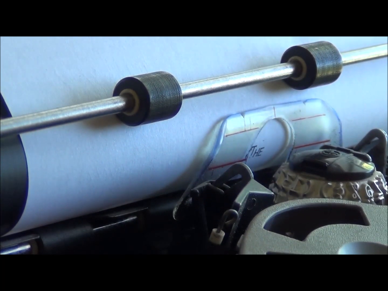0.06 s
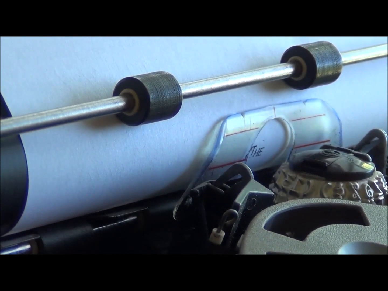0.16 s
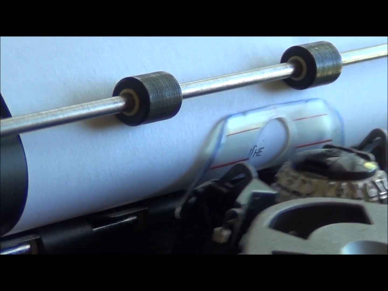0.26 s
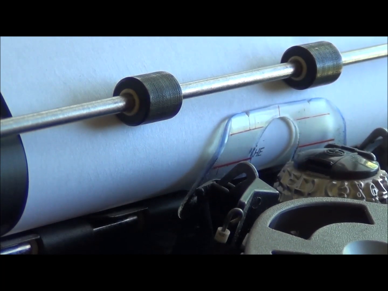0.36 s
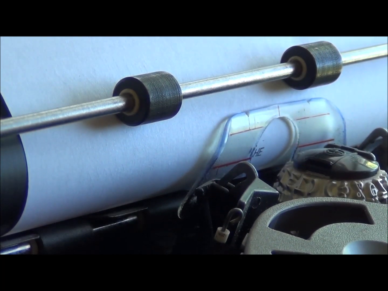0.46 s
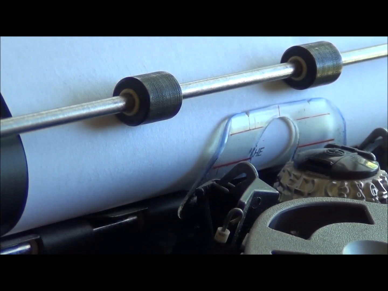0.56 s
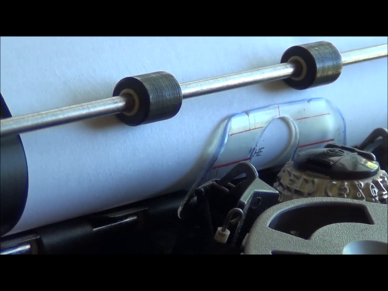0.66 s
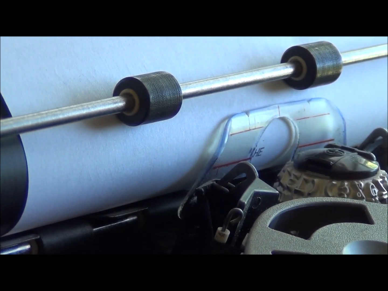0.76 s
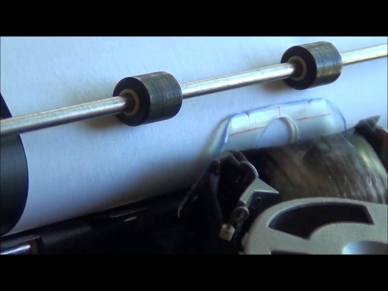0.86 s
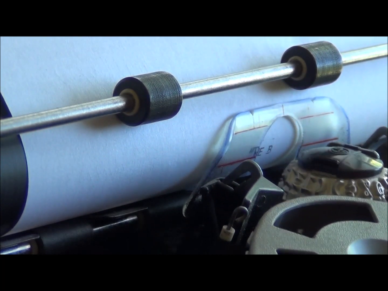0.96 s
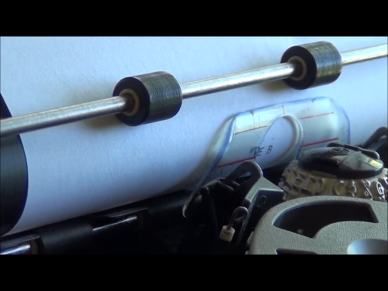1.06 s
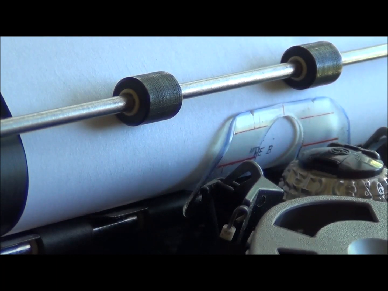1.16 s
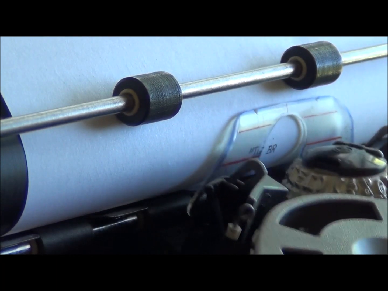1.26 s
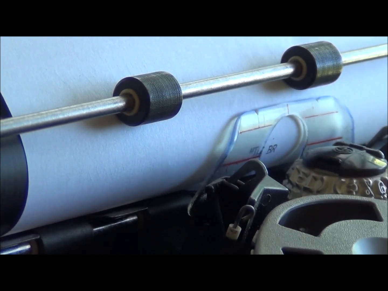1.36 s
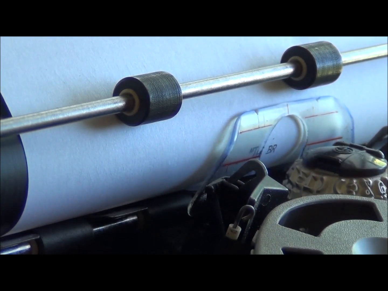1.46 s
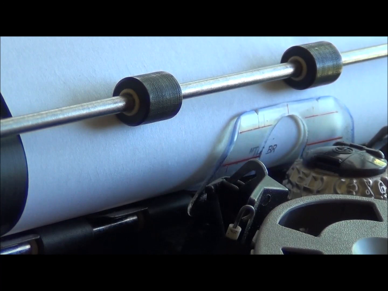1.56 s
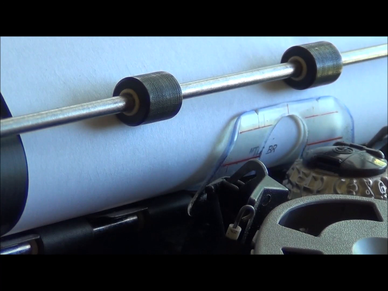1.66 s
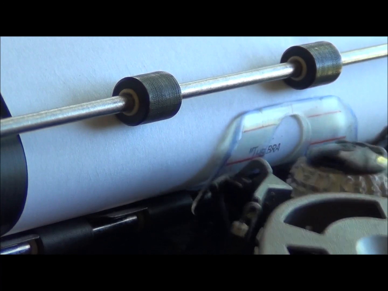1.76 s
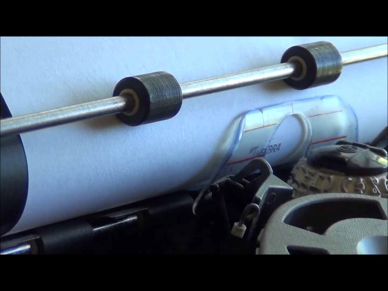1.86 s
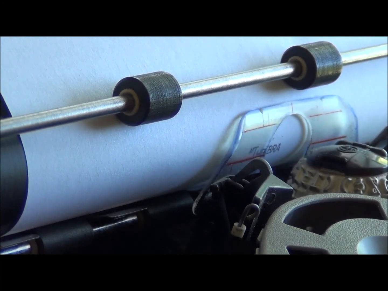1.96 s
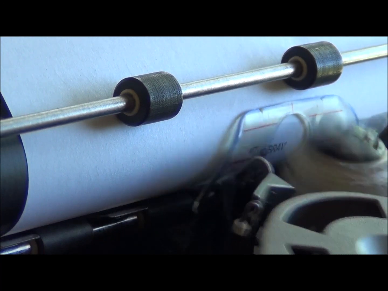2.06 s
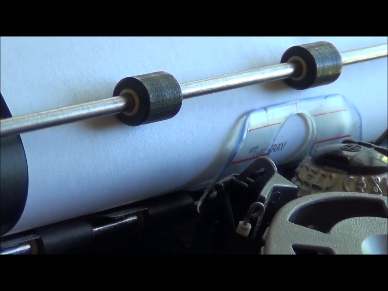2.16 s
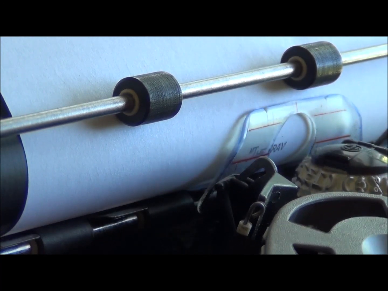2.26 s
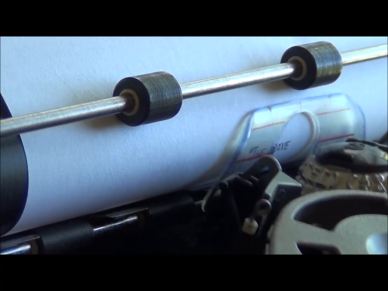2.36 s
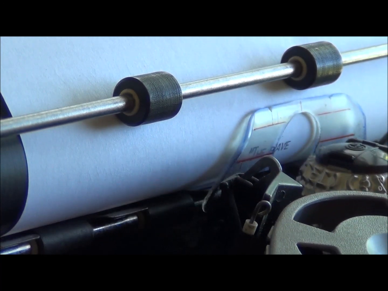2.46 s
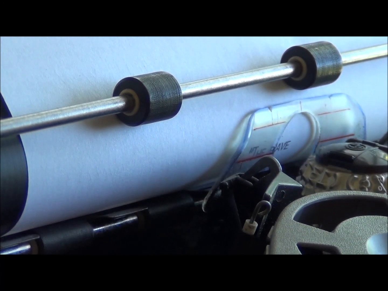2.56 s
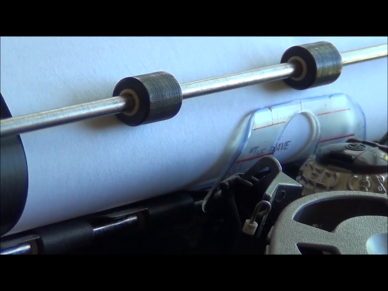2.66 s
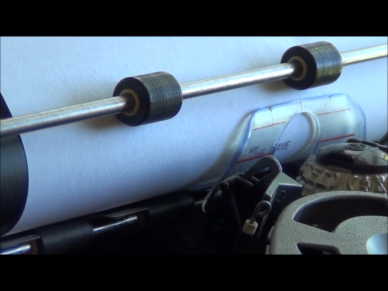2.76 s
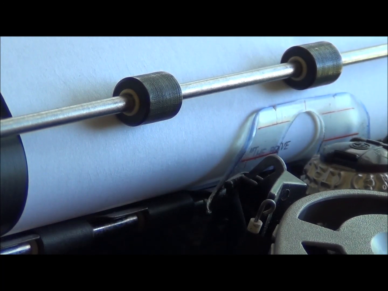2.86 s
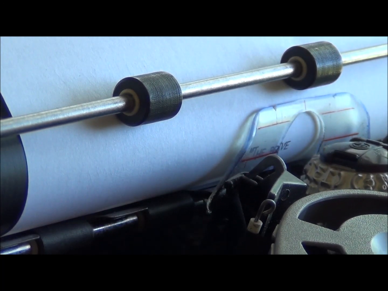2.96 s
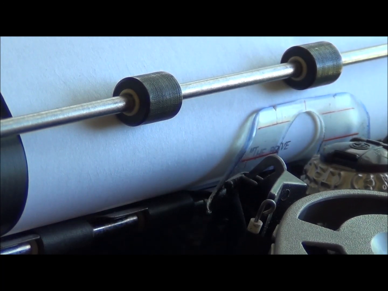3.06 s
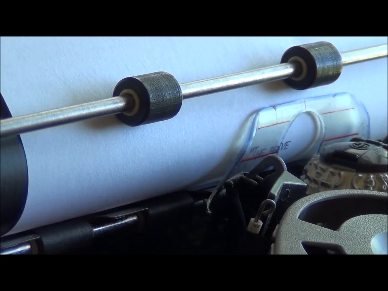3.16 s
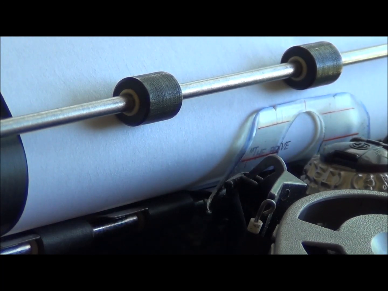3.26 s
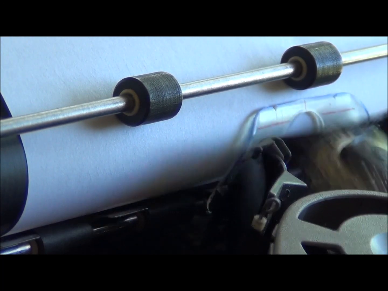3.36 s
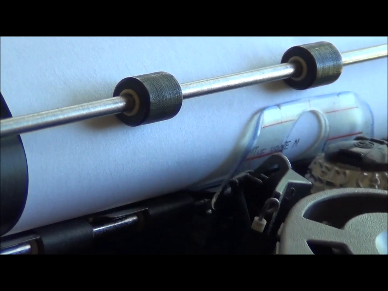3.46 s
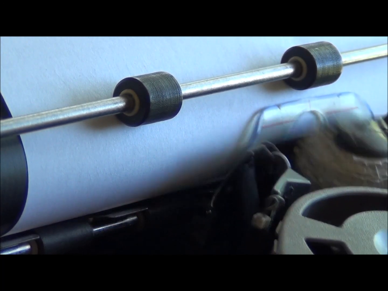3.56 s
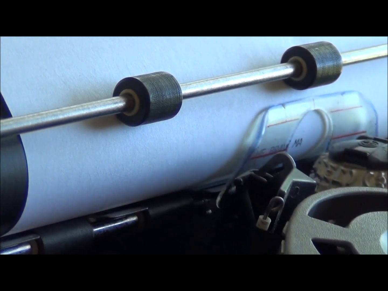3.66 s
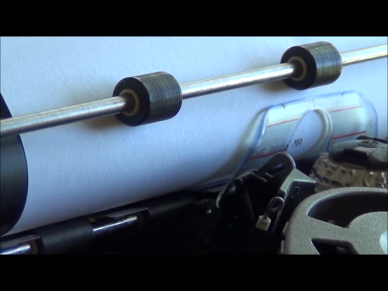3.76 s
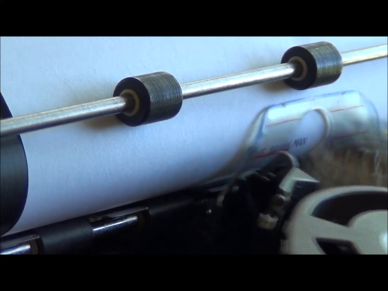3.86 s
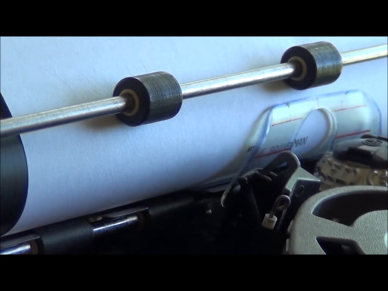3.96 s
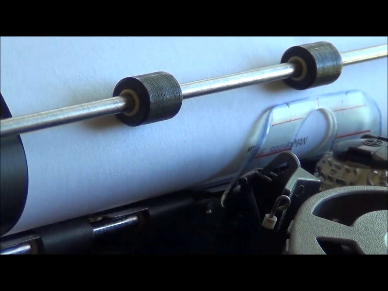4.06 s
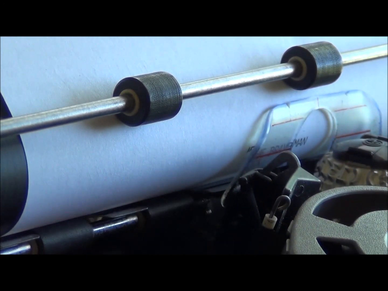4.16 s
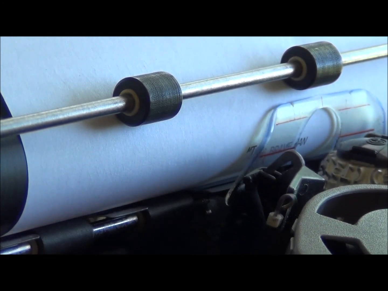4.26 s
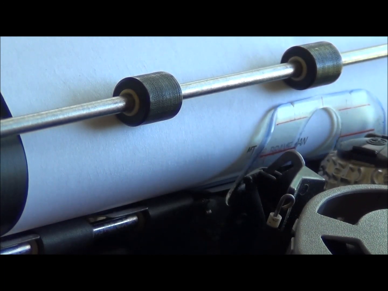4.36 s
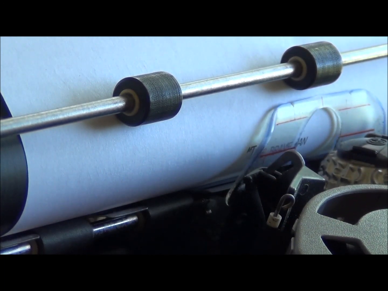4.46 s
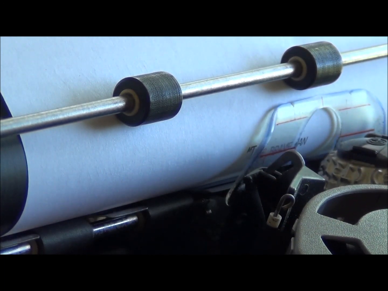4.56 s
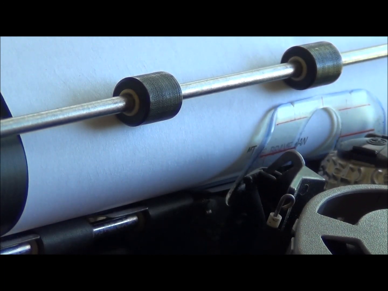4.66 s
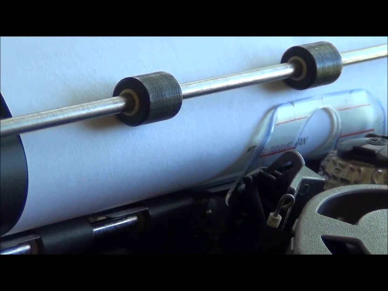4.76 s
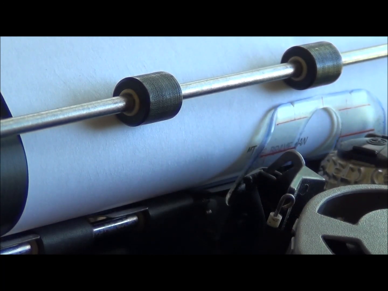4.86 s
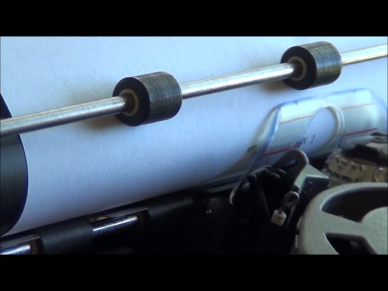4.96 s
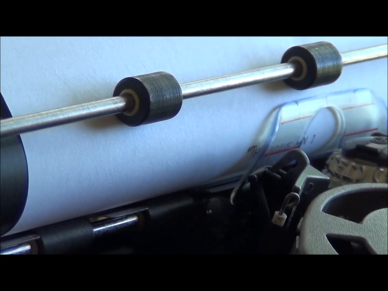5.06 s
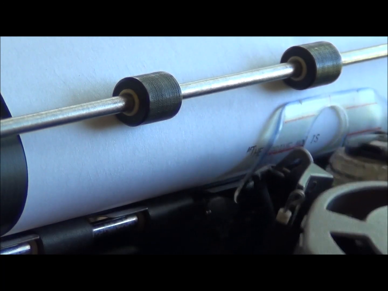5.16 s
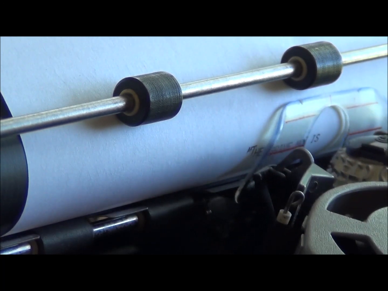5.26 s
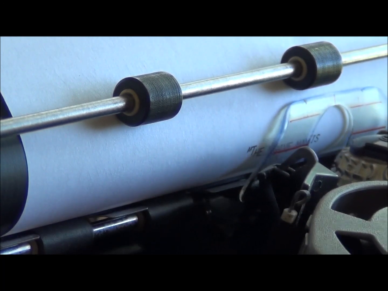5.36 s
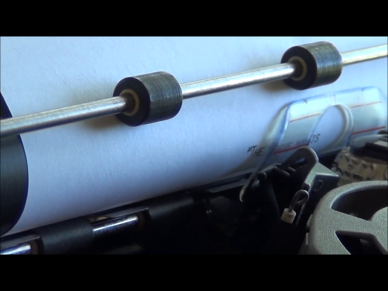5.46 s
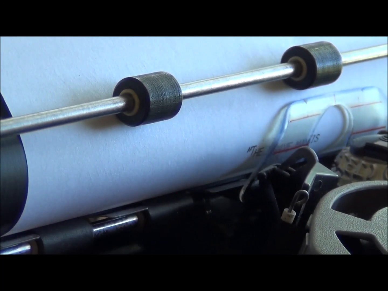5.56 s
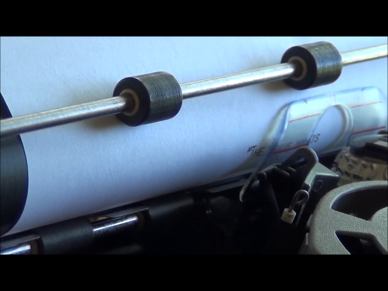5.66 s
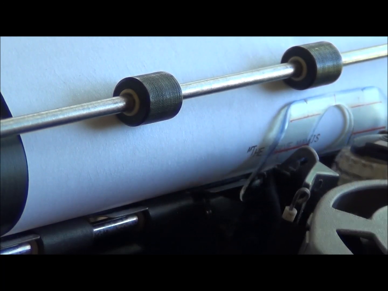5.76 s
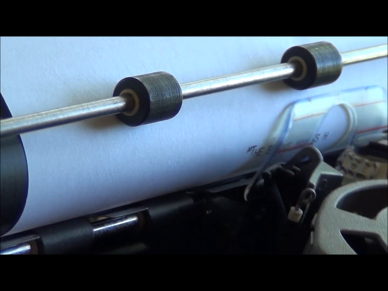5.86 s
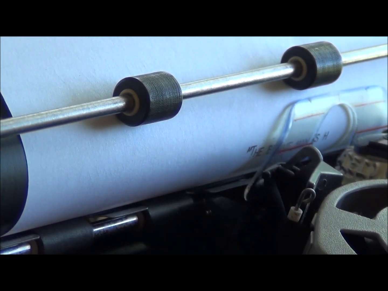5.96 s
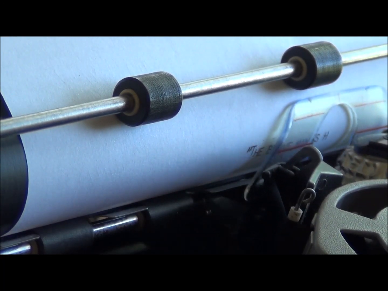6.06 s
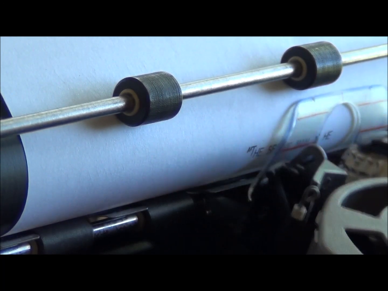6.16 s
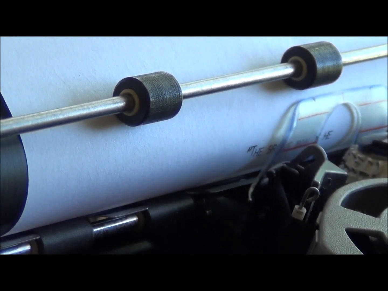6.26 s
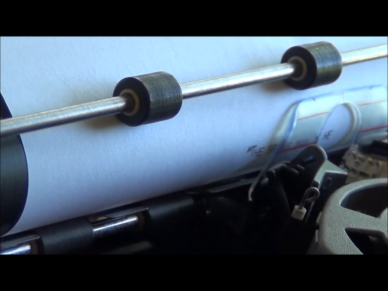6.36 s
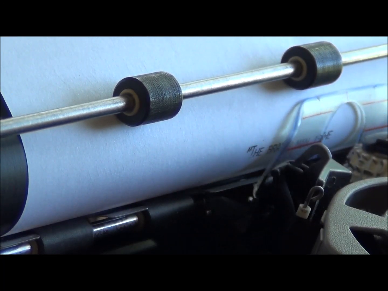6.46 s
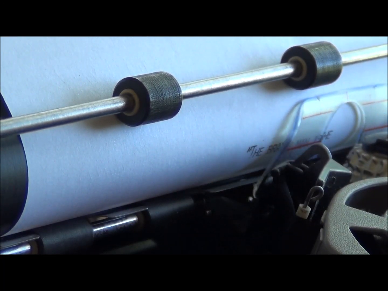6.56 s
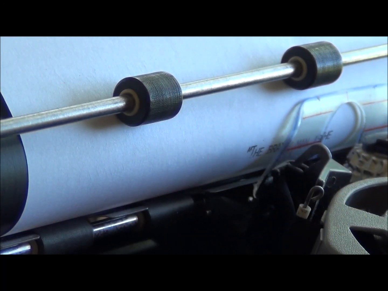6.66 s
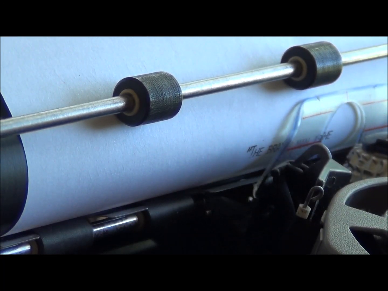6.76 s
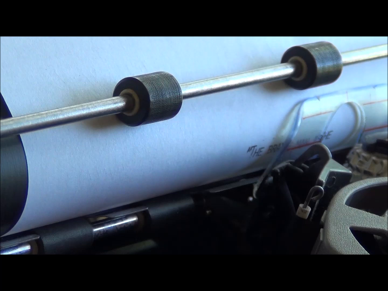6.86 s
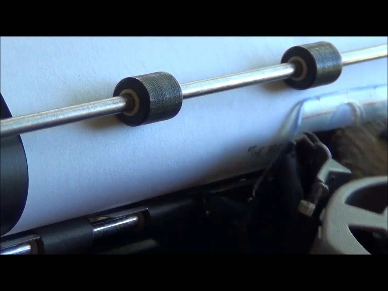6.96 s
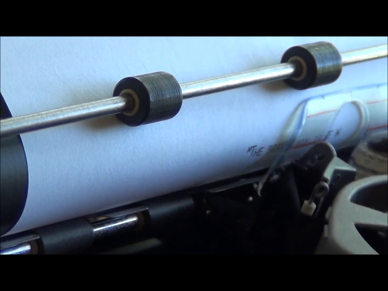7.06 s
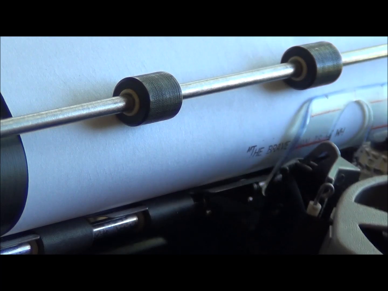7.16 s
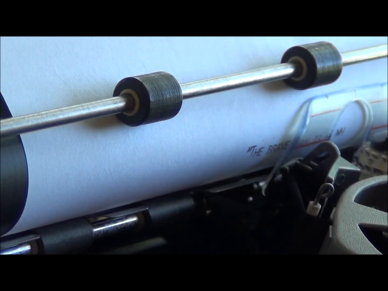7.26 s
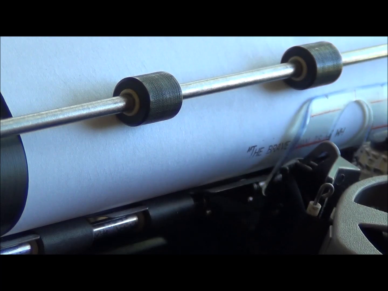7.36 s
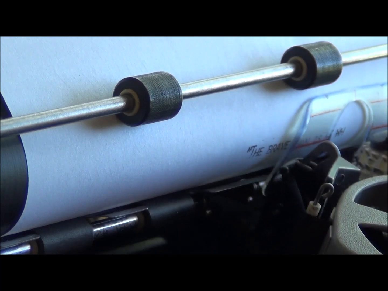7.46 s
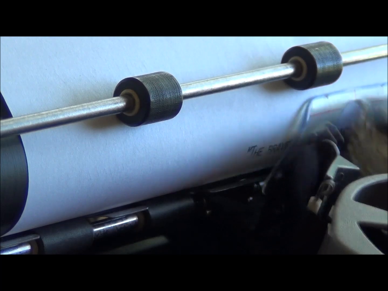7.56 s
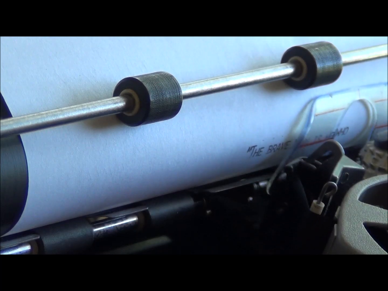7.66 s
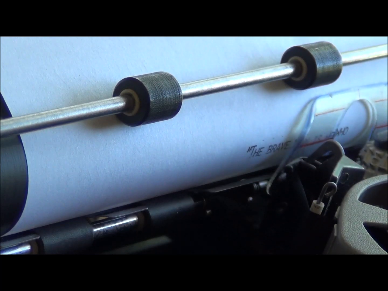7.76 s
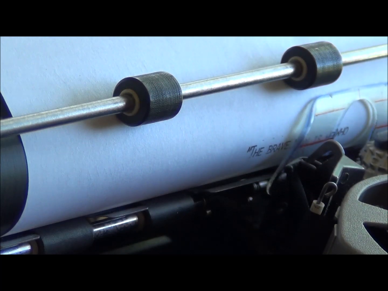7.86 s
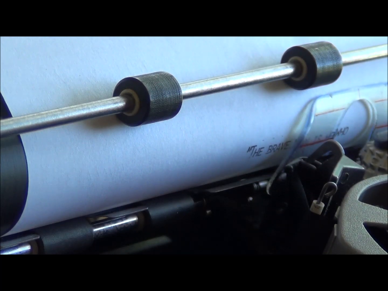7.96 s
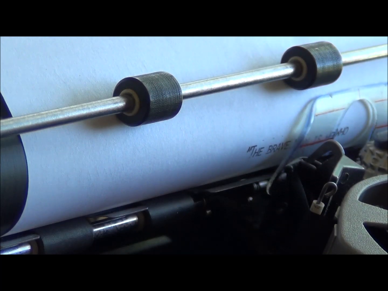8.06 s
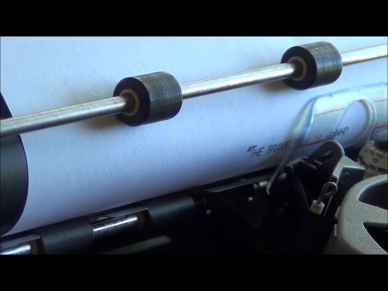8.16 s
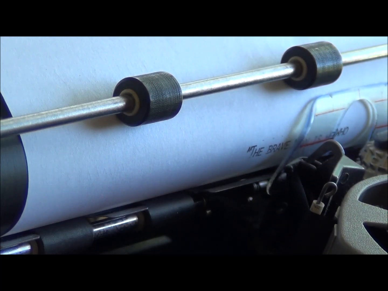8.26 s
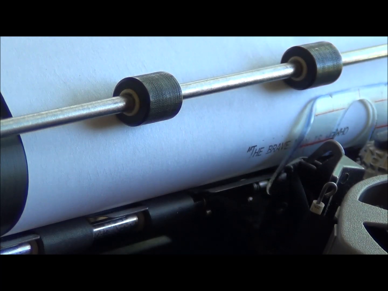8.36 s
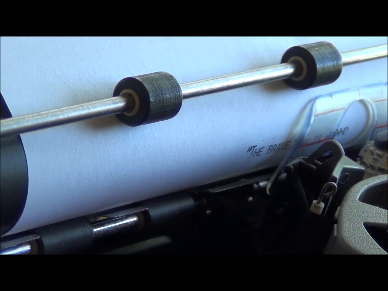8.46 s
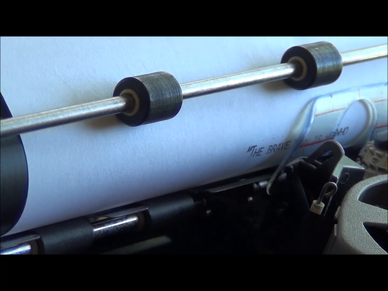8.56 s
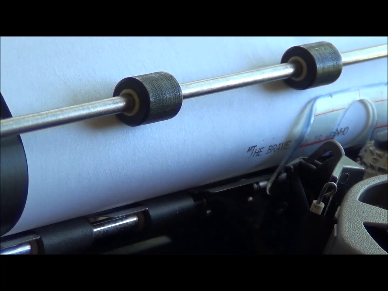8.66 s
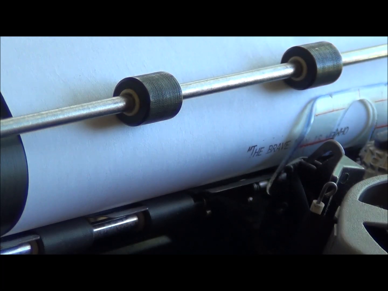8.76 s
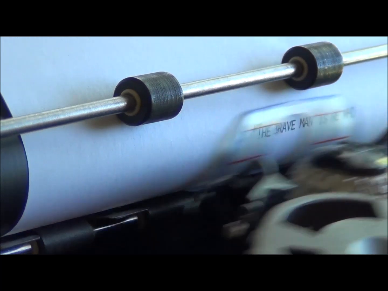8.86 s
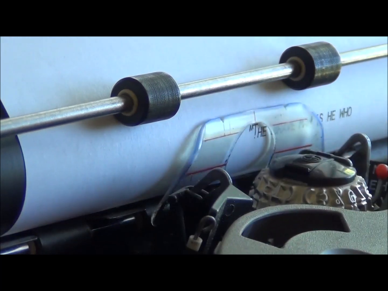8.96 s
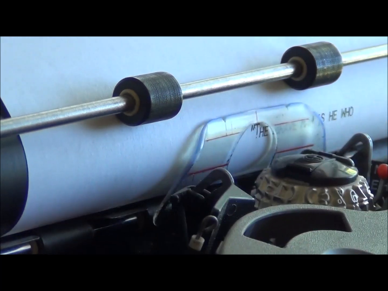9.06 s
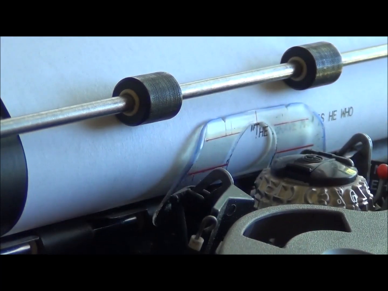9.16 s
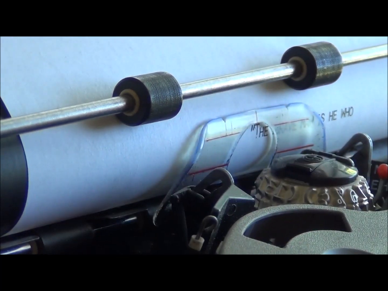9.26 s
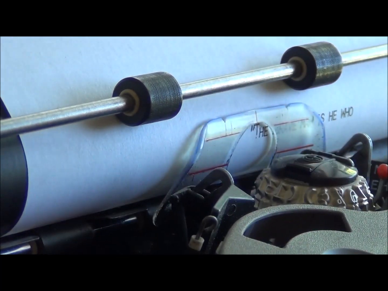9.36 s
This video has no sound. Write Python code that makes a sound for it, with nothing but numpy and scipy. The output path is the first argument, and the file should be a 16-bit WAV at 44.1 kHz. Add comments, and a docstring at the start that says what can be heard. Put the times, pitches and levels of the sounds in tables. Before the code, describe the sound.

An electric typewriter is heard close up in a small room, its motor humming and whirring softly throughout. Each letter is a sharp, rattling steel clack with a brief metallic ring. One strikes right at the start, then five follow unevenly between 0.9 and 2.3 seconds. Three more come from 3.4 to 3.9 seconds, pairs around 5 and 6 seconds, and another three from 7 to 7.6 seconds. Lighter space bar clicks fall between the words at about 0.3, 2.8, 4.3, 5.4 and 6.4 seconds. Around 8 seconds the belt gives a very faint, thin, high squeal. At 8.7 seconds the carrier jerks back and hits its stop with a quick clatter, the paper ratchets up, and the machine shudders briefly. One last letter strikes at about 9.4 seconds over the continuing hum.

```python
"""An electric type-ball typewriter, heard close up in a small room. Its motor hums from the start.
A few words are typed: each key trips a cam, which fires a quick volley of steel blows that rattle
and ring the carrier (the part that carries the ball), the rack and the case. Near 8 seconds the belt
slips and squeals faintly. Then the carrier returns, the paper moves up, and one more letter begins.
All along, a limiter flattens each volley."""
import sys
import numpy as np
from scipy import signal
from scipy.fft import rfft, irfft
from scipy.io import wavfile
from scipy.ndimage import uniform_filter1d

SR = 44100
rng = np.random.default_rng(int(sys.argv[2]) if len(sys.argv) > 2 else 0)


def generate_wav(signal):
    """Clip the signal to [-1, 1] and save it as 16-bit WAV at the path in sys.argv[1]."""
    frames = np.transpose(np.atleast_2d(signal))
    scaled = np.clip(frames, -1, 1) * 32767
    pcm = np.round(scaled).astype(np.int16)
    wavfile.write(sys.argv[1], SR, pcm)


N = 415422

# The hum of the motor and its belt. Each row: pitch in Hz, level in dB.
HUM_TONES = [(58.6, -68), (120, -71.5), (234, -62.5), (281, -63), (354, -62), (469, -63), (645, -70.5),
             (840, -73.5), (942, -83)]
# The tone colour of the motor's whirr. Each row: frequency in Hz, relative level in dB.
WHIRR_COLOUR = [(15, -29.5), (33, -8), (80, -13), (130, -11.5), (230, -5.5), (370, -9.5), (520, -13),
                (850, -17.5), (1500, -17), (2600, -26.5), (4000, -30.5), (6500, -37.5), (10000, -39),
                (16000, -44)]
# The belt chirps on its pulley: pitch in Hz, level in dB, depth of the pulsing.
BELT_CHIRP = (2585, -71.5, .9)
# The tone colour of a steel clack. Each row: frequency in Hz, relative level in dB.
STEEL_COLOUR = [(40, -34), (130, -26.5), (280, -5), (600, -2.5), (950, -4), (1600, 2), (2100, -3.5),
                (2900, 2), (4500, -3.5), (6300, -4), (8800, -4.5), (10200, -6.5), (13000, -8.5),
                (15800, -17)]
# The notes each part rings with. Each row: pitch in Hz, level in dB, seconds to fade by 60 dB.
PART_NOTES = {"carrier": [(1272.6, 1, 0.2), (1287, 0.5, 0.28), (1440, 5, .07), (719, -2.5, .12),
              (670, -21.5, 0.088), (1168, -10, 0.05)], "rack": [(1569, 9, 0.021), (1507, -4, 0.12),
              (1580, -22.5, 0.076), (1690, -14, 0.21), (1825, -7, 0.042), (2540, -5.5, 0.062),
              (796, -21.5, 0.32)], "ball": [(9430, -1, 0.091), (8640, -10.5, 0.064), (10821, -8, .14),
              (12900, -7.5, .15), (11300, -15, .12), (8700, -4, 0.11)], "stop": [(1000, -2, 0.075),
              (810, -2, .06), (1140, -8, 0.068), (624, -2.5, 0.07), (1600, 4, 0.04)],
              "ratchet": [(2600, 8, 0.053), (3200, -13, 0.052), (2480, 2, 0.052), (3420, 0, 0.1)],
              "base": [(122, -3, .2), (160, -7, 0.27), (220, -13, .15), (291, 5.5, 0.34), (440, -11, .15),
              (535, -6.5, 0.67)], "pawl": [(7460, 3, 0.012), (8370, -2, 0.0051), (9080, -1.5, 0.021),
              (3300, -17.5, 0.084)], "spring": [(12440, 5, 0.031), (12500, 4.5, .06), (11700, 7, 0.15)],
              "case": [(281, 1, 0.18), (320, -9.5, 0.087), (372.6, 1, 0.14), (230, -16.5, 0.3),
              (477.5, -9.5, 0.22), (516.8, -10, 0.16), (129, -18, .17), (170.8, -22, 0.42)]}

# The typed letters. Each row: strike time in seconds, force in dB, stretch factor for the timing of
# its blows, added brightness in dB per octave, extra ring of the ball in dB.
LETTER_KEYS = [(-.05, -1.5, 1.05, 2, -11), (.8962, 0.5, 0.98, -0.05, -7), (1.2271, -2, 1.01, 0, 12),
               (1.7637, -.5, 0.98, 0, 10), (2.0787, -3, 1.02, -0.1, 9.5), (2.3296, -4, 1.003, -0.1, 5.5),
               (3.399, -1, 1.02, 0.3, 11.5), (3.5875, -1, 1.015, -0.3, 5.5), (3.8759, -2, 1.01, -0.1, 7.5),
               (4.935, 0, 1.065, -0.3, 8), (5.1613, .5, 1.01, -.2, 3.5), (5.8241, 0, 1, -0.5, -10.5),
               (6.1561, -1, 1.01, -0.3, 10), (6.9948, 1, 1.074, -.7, -8), (7.1221, -.5, .96, 0.4, 4),
               (7.587, -1.5, 1.084, -0.4, 6), (9.4455, 2, 1, 1, -7)]
# The blows of a letter. Each row: seconds from the strike, clack level in dB, rattle fade in seconds,
# brightness in dB per octave, thump of the case in dB, the part that rings, its ring level in dB.
LATCH = (-.064, -40.5, .002, 5.5, -66, "pawl", -50)
CLUTCH = (-.0485, -27.5, .0045, .5, -51.5, "pawl", -18.5)
BALL_TILT = (-.042, -18.5, 0.0097, .8, -32.5, "carrier", -29.5)
BALL_TURN = (-.025, -23.5, 0.01, 1.2, -41, "ball", -33)
DETENT = (-.009, -22, .002, 0, -36.5, "carrier", -50)  # a catch that locks the ball in place
STRIKE = (0, -13, .002, 1.3, -30, "ball", -35.5)
CARRIER_STEP = (.017, -20.5, 0.013, 2.2, -36.5, "rack", -22)
BALL_DROP = (.0409, -27.5, .001, -1, -38.5, "pawl", -23.5)  # the ball drops back with a sharp, high tick
BALL_REST = (.043, -37.5, .003, 4, -45, "ball", -43)  # the ball falls back and pings

# The spaces. Each row is like a letter's, but the time is the carrier's step and the spring rings.
SPACE_KEYS = [(0.2823, 1.2, 1.03, 0.52, 6), (2.8221, -0.42, 1.057, 0, 9), (4.268, -0.93, 1, 0, 7),
              (5.3687, 1.1, 1, 0, 16.5), (6.4132, 0, 1, 0, 1)]
# The blows of a space. Each row is like a letter's blow, timed from the carrier's step.
BAR_TRIP = (-.059, -35.5, 0.0071, 1.5, -50.5, "carrier", -43)
BAR_SPRING = (-.053, -25.5, 0.0088, 1.8, -41, "spring", -50.5)
CAM_TURN = (-.033, -45.5, .012, .5, -47, "rack", -55.5)
PAWL_LIFT = (-.009, -26, 0.0071, 0.52, -49, "pawl", -21)
SPACE_STEP = (0, -22.5, 0.0079, .5, -43.5, "rack", -28)
# The space bar clicks when touched and when it comes back up. Each row: start in seconds, force in dB.
BAR_CLICKS = [(0.1914, -12), (.380, 0), (2.731, -16), (2.9188, -2), (4.183, -15), (4.368, -2.5),
              (5.481, 2.5), (6.5286, -1.5)]
# One such click: a blow's row without the time.
BAR_BLOW = (-32.5, .0025, 2, -48, "rack", -53.5)

# The slipping belt's note: pitch in Hz, level in dB, overtones in dB compared with the note.
SQUEAL_NOTE = (2528, -69, -3)
# When it slips: start in seconds, end in seconds.
SQUEAL_SPAN = (7.74, 8.2)

# The blows of the carrier's return. Each row is like a letter's blow, timed from the first pull.
RETURN_PULL = (0, -21.5, 0.0077, 2.7, -52, "carrier", -45.5)
RETURN_SLIDE = (0.028, -34.5, 0.078, -3.5, -52, "rack", -39)
RETURN_BRAKE = (.075, -24.5, .003, 3.5, -54, "carrier", -37)
MARGIN_STOP = (.0862, -23.5, .001, -3.5, -39, "stop", -25)
REBOUND = (.099, -29, 0.021, -1, -39, "rack", -35)
UNLATCH = (.122, -20.5, 0.01, .5, -40.5, "ratchet", -37)
STOP_SHUDDER = (.142, -33, 0.011, -8, -40, "base", -45)  # the whole machine rocks on its base
LINE_FEED = (.2145, -22.5, 0.012, 2.2, -38, "ratchet", -34.5)
FEED_SHUDDER = (.237, -34.5, .015, -8.5, -42, "base", -37)
# A light latch clicks just before the pull and the line feed: a blow's row, timed from each of them.
RETURN_LATCH = (-.0068, -36.5, .003, 2.5, -59, "pawl", -50)

# How long the frame and the room ring on. Each row: frequency in Hz, seconds to fade by 60 dB.
FRAME_FADE = [(200, 0.077), (1500, 0.16), (5000, 0.11), (15000, 0.05)]
ROOM_FADE = [(150, 0.47), (500, 0.98), (1500, 0.61), (3000, 0.53), (6000, 0.5), (10000, 0.25),
             (16000, 0.36)]
# How much left and right differ. Each row: frequency in Hz, gain of the difference in dB.
STEREO_WIDTH = [(50, -54), (120, -41.5), (280, -49.5), (550, -21), (1100, -19), (2200, -16.5), (4500, -9.5),
                (8000, -12.5), (12000, -30), (16000, -40)]


def gain_of(db):
    """Turns decibels into a number to multiply by."""
    return 10 ** (np.asarray(db) / 20)


def evened(x):
    """Scales a signal to an average power of 1."""
    return x / np.sqrt(np.mean(x ** 2) + 1e-20)


def look_up(table, hz):
    """Reads between a table's rows, with frequency counted in octaves."""
    row_hz, values = np.transpose(table)
    return np.interp(np.log(hz + 1), np.log(row_hz + 1), values)


def add(mix, start_s, sound):
    """Adds a sound to the mix, cutting off whatever sticks out at either end."""
    start = round(start_s * SR)
    sound = sound[max(-start, 0):]
    part = mix[max(start, 0):][:len(sound)]
    part += sound[:len(part)]


def coloured(x, table):
    """Turns each frequency up or down by a table's decibels."""
    hz = np.fft.rfftfreq(len(x), 1 / SR)
    return irfft(rfft(x) * gain_of(look_up(table, hz)), len(x))


def drift(hz):
    """A smooth random wobble, up to about hz times a second."""
    rolloff = 1 + (np.fft.rfftfreq(N, 1 / SR) / hz) ** 4
    return evened(irfft(rfft(rng.standard_normal(N)) / rolloff, N))


def motor(pulley_hz=29, waver=0.16, wander_hz=1.2, whirr_db=-56, throb=0.1, flutter_hz=18):
    """The motor hums and whirrs, and the belt chirps faintly at each turn of the pulley."""
    t = np.arange(N) / SR
    turn = np.cos(2 * np.pi * (pulley_hz * t + np.cumsum(drift(2.2)) / SR / 2))
    hum = np.zeros(N)
    for hz, db in HUM_TONES:
        level = np.sqrt(2) * gain_of(db) * (1 + waver * drift(7.9))
        cycles = hz * t + wander_hz * np.cumsum(drift(3.6)) / SR
        hum += level * np.sin(2 * np.pi * cycles)
    whirr = evened(coloured(rng.standard_normal(N), WHIRR_COLOUR)) * (1 + throb * turn)
    hz, db, depth = BELT_CHIRP
    pulses = gain_of(db) * evened(np.exp(2 * depth * turn))
    chirp = pulses * np.sin(2 * np.pi * np.cumsum(hz + flutter_hz * drift(60)) / SR)
    return hum + gain_of(whirr_db) * whirr + chirp


def steel_click(brightness, size=2048):
    """One sharp click on steel; more brightness tips it toward the treble."""
    hz = abs(np.fft.fftfreq(size, 1 / SR))
    octaves = np.log2(np.maximum(hz, 500) / 4000)
    log_gain = np.log(gain_of(look_up(STEEL_COLOUR, hz) + brightness * octaves))
    spectrum = np.exp(np.conj(signal.hilbert(log_gain)))  # packs the energy at the start
    click = np.fft.ifft(spectrum).real[:size // 2]
    return click / np.linalg.norm(click)


def clack(rattle_s, brightness, contact_s=0.0025, rise_s=0.00088, lever_s=0.0062, size=4096):
    """One hard contact, then loose parts chatter and six small levers ring briefly."""
    t = np.arange(size) / SR
    grains = evened(gain_of(3.5 * np.repeat(rng.standard_normal(size // 32), 32)))
    chatter = gain_of(-1) * grains * np.exp(-t / max(rattle_s, contact_s))
    force = np.exp(-t / contact_s) + chatter
    pitch, phase = rng.random((2, 6, 1))
    lever_hz = 2000 + 11000 * pitch ** 2
    levers = np.sin(2 * np.pi * (lever_hz * t + phase)).mean(0)
    zing = gain_of(-8) * evened(levers) * np.exp(-t / lever_s)
    shaking = (force * rng.standard_normal(size) + zing) * (1 - np.exp(-t / rise_s))
    return signal.fftconvolve(shaking, steel_click(brightness))


def ring(part, rise_s=0.00086, detune=0.0036, detune_hz=10, size=12000):
    """A struck part rings with its own fading notes, tuned a little differently each time."""
    t = np.arange(size) / SR
    hz, db, fade_s = np.transpose(PART_NOTES[part])[:, :, None]
    shift, phase = rng.standard_normal(hz.shape), rng.random(hz.shape)
    hz = hz + shift * np.maximum(detune * hz, detune_hz)
    notes = gain_of(db - 60 * t / fade_s) * np.sin(2 * np.pi * (hz * t + phase))
    return notes.sum(0) * (1 - np.exp(-t / rise_s))


def blow(clack_db, rattle_s, brightness, thump_db, part, ring_db):
    """Steel hits steel: a clack, the ring of the struck part, and the slower thump of the case."""
    sound = gain_of(ring_db) * ring(part)
    sound += gain_of(thump_db) * ring("case", rise_s=0.004, detune_hz=3.87)
    add(sound, 0, gain_of(clack_db) * clack(rattle_s, brightness))
    return sound


def knocks(first, count, gap_s, drop_db, duller, thump_drop_db):
    """Repeats a blow's row, each time weaker and duller; negative steps go the other way."""
    start_s, clack_db, rattle_s, brightness, thump_db, part, ring_db = first
    return [(start_s + k * gap_s, clack_db - k * drop_db, rattle_s, brightness - k * duller,
             thump_db - k * thump_drop_db, part, ring_db - k * drop_db) for k in range(count)]


def typing(keys, blows, uneven_db=2.0, jitter_s=.0004):
    """Each key turns the cam once, firing the same blows with slightly uneven timing and force."""
    out = np.zeros(N)
    for key_s, force_db, stretch, brighter, extra_db in keys:
        for delay_s, clack_db, rattle_s, brightness, thump_db, part, ring_db in blows:
            late, softer = rng.standard_normal(2)
            if part in ("ball", "spring"):
                ring_db += extra_db
            sound = blow(clack_db, rattle_s, brightness + brighter, thump_db, part, ring_db)
            start_s = key_s + delay_s * stretch + jitter_s * late
            add(out, start_s, gain_of(force_db - uneven_db * softer) * sound)
    return out


def letters():
    """Latches trip the clutch, the ball tilts, turns and strikes, and the carrier bounces onward."""
    latches = knocks(LATCH, count=2, gap_s=0.01, drop_db=0, duller=0.5, thump_drop_db=5)
    tilting = knocks(BALL_TILT, count=2, gap_s=.008, drop_db=6.5, duller=-0.3, thump_drop_db=3.8)
    turning = knocks(BALL_TURN, count=2, gap_s=.0078, drop_db=0.6, duller=-2.7, thump_drop_db=-0.7)
    stepping = knocks(CARRIER_STEP, count=4, gap_s=.0145, drop_db=6.5, duller=2.5, thump_drop_db=-1.46)
    blows = [*latches, CLUTCH, *tilting, *turning, DETENT, STRIKE, *stepping, BALL_DROP, BALL_REST]
    return typing(LETTER_KEYS, blows)


def spaces():
    """The space bar trips its cam, the carrier steps without a strike, and the bar clicks back."""
    turning = knocks(CAM_TURN, count=2, gap_s=0.015, drop_db=-6.5, duller=1.8, thump_drop_db=8)
    stepping = knocks(SPACE_STEP, count=4, gap_s=.0055, drop_db=7, duller=1.3, thump_drop_db=-2.5)
    out = typing(SPACE_KEYS, [BAR_TRIP, BAR_SPRING, *turning, PAWL_LIFT, *stepping])
    for start_s, force_db in BAR_CLICKS:
        add(out, start_s, gain_of(force_db) * blow(*BAR_BLOW))
    return out


def belt_squeal(flutter_hz=12, shimmer=.45):
    """The slipping belt sings one thin, fluttering note that swells and fades."""
    start_s, end_s = SQUEAL_SPAN
    hz, db, overtones_db = SQUEAL_NOTE
    progress = np.clip((np.arange(N) / SR - start_s) / (end_s - start_s), 0, 1)
    swell = np.sin(np.pi * progress) ** 2
    phase = 2 * np.pi * np.cumsum(hz + flutter_hz * drift(60)) / SR
    overtones = gain_of(overtones_db) * (np.sin(2 * phase) + 0.31 * np.sin(3 * phase))
    return gain_of(db) * swell * (1 + shimmer * drift(45)) * (np.sin(phase) + overtones)


def carrier_return(start_s=8.726):
    """The carrier is jerked back into the margin stop, the paper moves up, and the machine shudders."""
    pulling = knocks(RETURN_PULL, count=4, gap_s=.0095, drop_db=1.4, duller=1.6, thump_drop_db=-3)
    unlatching = knocks(UNLATCH, count=2, gap_s=.02, drop_db=9, duller=5, thump_drop_db=1)
    rocking = knocks(STOP_SHUDDER, count=2, gap_s=.022, drop_db=-1, duller=5, thump_drop_db=2)
    feeding = knocks(LINE_FEED, count=3, gap_s=0.0096, drop_db=-0.5, duller=1.5, thump_drop_db=-2)
    settling = knocks(FEED_SHUDDER, count=6, gap_s=.042, drop_db=4.5, duller=-0.5, thump_drop_db=2)
    latch_s, *latch = RETURN_LATCH
    latches = [(row[0] + latch_s, *latch) for row in (RETURN_PULL, LINE_FEED)]
    blows = [*latches, *pulling, RETURN_SLIDE, RETURN_BRAKE, MARGIN_STOP, REBOUND,
             *unlatching, *rocking, *feeding, *settling]
    out = np.zeros(N)
    for delay_s, *settings in blows:
        add(out, start_s + delay_s, blow(*settings))
    return out


def echoes(x, fades, size):
    """A wash of echoes: each frequency band stores the power it gets and lets it out as fading noise."""
    hop = size // 4
    slicing = dict(fs=SR, nperseg=size, noverlap=size - hop)
    hz, _, bands = signal.stft(x, **slicing)
    kept = gain_of(-60 * hop / SR / look_up(fades, hz)) ** 2  # share of power left after each hop
    stored = np.array([signal.lfilter([1 - k], [1, -k], abs(band) ** 2) for k, band in zip(kept, bands)])
    noise = signal.stft(rng.standard_normal(N), **slicing)[2]
    wash = signal.istft(np.sqrt(stored) * noise / np.std(noise), **slicing)[1]
    return np.pad(wash, (size // 2, 0))[:N]


def scene(frame_db=-4.5, room_db=-11, near_width_db=-8):
    """The blows ring in the frame and the room; left and right differ mainly in the room's sound."""
    hits = letters() + spaces() + carrier_return()
    frame = echoes(hits, FRAME_FADE, size=512)
    frame = coloured(frame, [(170, -15), (400, 0.5), (900, 0)])  # steel takes up little bass
    near = hits + gain_of(frame_db) * frame
    around = gain_of(room_db) * echoes(hits, ROOM_FADE, size=1024) + motor() + belt_squeal()
    blurred = echoes(around + gain_of(near_width_db) * near, [(100, 0.032), (16000, .02)], size=256)
    side = coloured(blurred, STEREO_WIDTH)
    return np.array([near + around + side, near + around - side])


def record(dry, limit_db=-21, recovery_db_per_s=110, squeeze=0.51, ceiling=0.26, top_hz=15880):
    """A fast limiter turns loud volleys down and rounds their peaks; then the highest treble is cut."""
    power = uniform_filter1d((dry ** 2).mean(0), size=180)
    power_db = 10 * np.log10(abs(power) + 1e-12)
    recovery_db = np.arange(N) * recovery_db_per_s / SR
    peak_db = np.maximum.accumulate(power_db + recovery_db) - recovery_db  # jumps up, sinks steadily
    over_db = np.maximum(peak_db - limit_db, 0)
    held = dry / gain_of(squeeze * uniform_filter1d(over_db, size=60))
    rounded = held / (1 + (held / ceiling) ** 4) ** (1 / 4)
    treble_cut = signal.firwin(511, top_hz, window=("kaiser", 8), fs=SR)
    return signal.oaconvolve(rounded, treble_cut[None], "same")


dry = scene()
out = record(dry)
generate_wav(out)
```